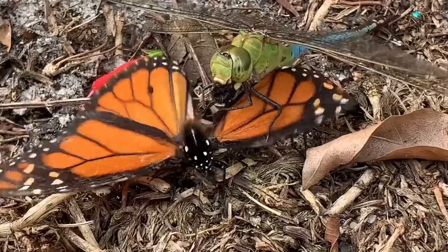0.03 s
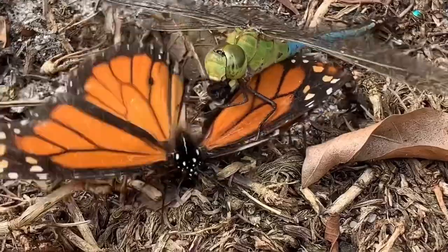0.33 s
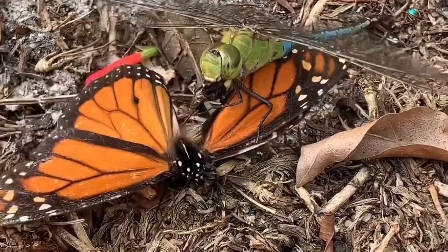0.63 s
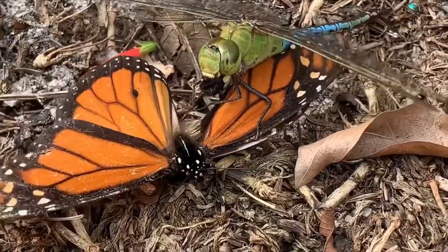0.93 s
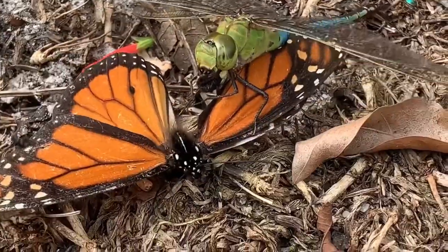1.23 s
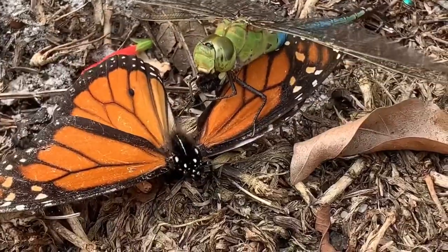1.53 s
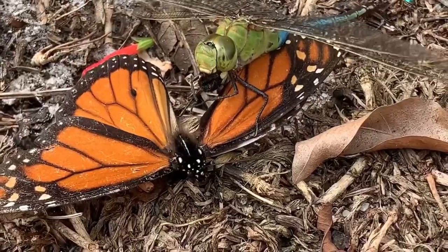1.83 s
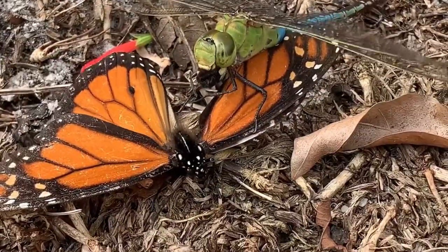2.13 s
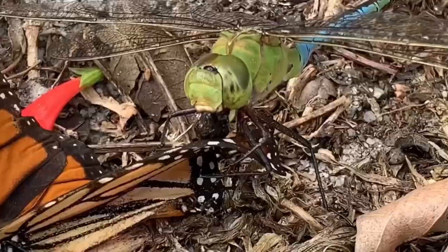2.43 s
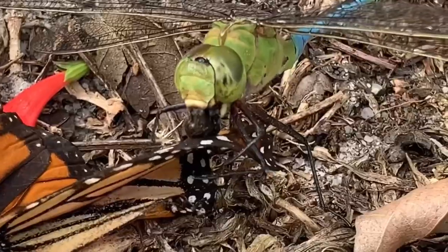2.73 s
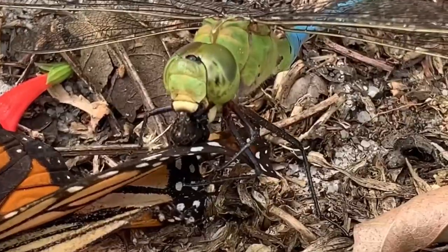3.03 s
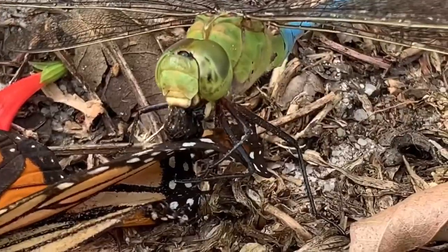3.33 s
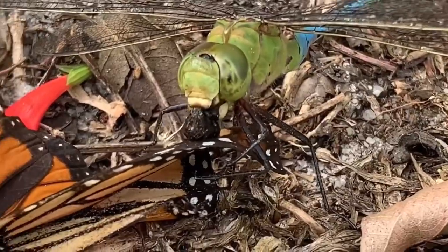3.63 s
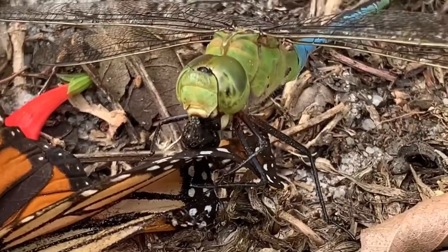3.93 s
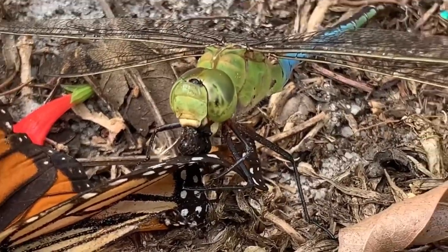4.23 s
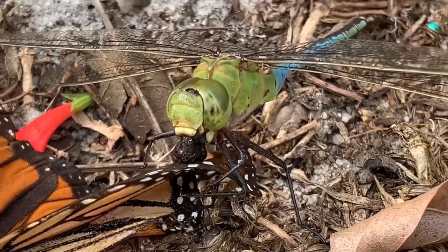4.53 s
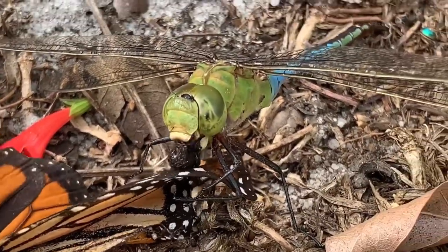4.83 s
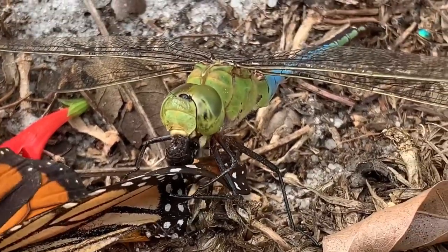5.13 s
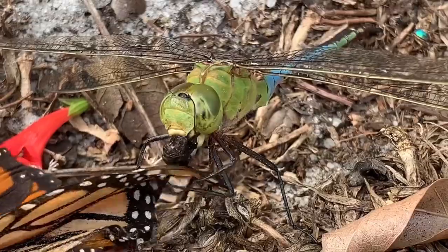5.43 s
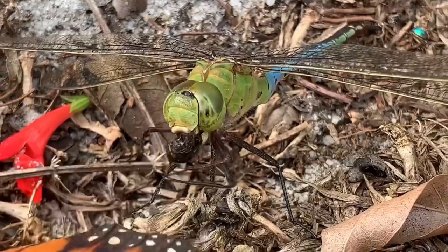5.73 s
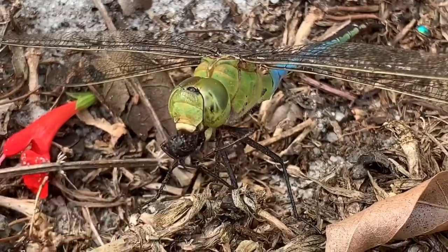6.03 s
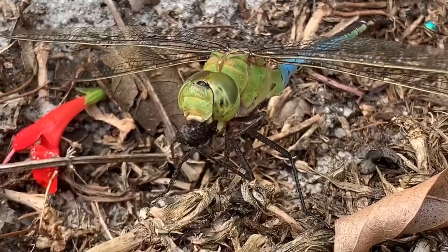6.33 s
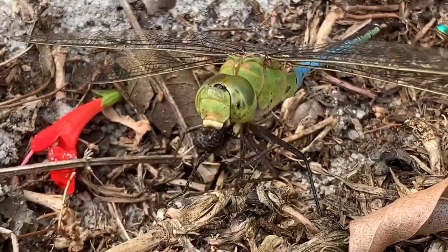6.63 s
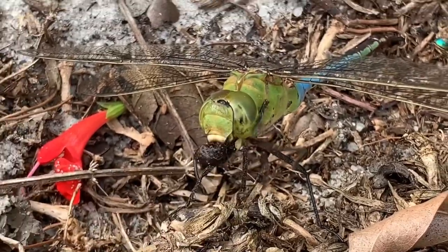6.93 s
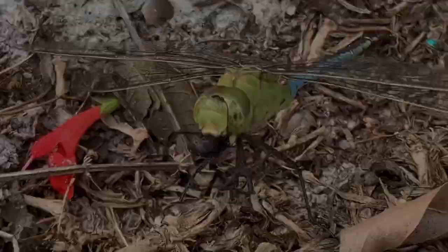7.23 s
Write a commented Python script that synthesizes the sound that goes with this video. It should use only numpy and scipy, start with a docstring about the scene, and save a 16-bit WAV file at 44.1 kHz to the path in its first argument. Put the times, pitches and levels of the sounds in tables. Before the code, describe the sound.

Outdoors, gusts rumble and slap against a close microphone while a butterfly held by a dragonfly rustles its wings on dry leaf litter, with small snaps. After about two seconds the wind cuts off with a tick, leaving a faint low hum of distant traffic. Near the end the wings scrape again, with one crisp burst of crackles, soft papery knocks and a small twig click.

```python
"""Gusts thump on a small stereo microphone while wings rustle and dry leaves snap close by:
a dragonfly grips a butterfly on leaf litter. Turbulent eddies make the rumble and the slaps;
stick-slip friction of wing on leaf makes the rustle. At 2.3 s the scene jumps, with a tick, to a
calm spell with the low hum of distant traffic, where the wings scrape again, the litter knocks
under the harder blows and a twig clicks."""
import sys
import numpy as np
from scipy import signal
from scipy.fft import rfft, irfft
from scipy.io import wavfile
from scipy.ndimage import uniform_filter1d

SR = 44100
rng = np.random.default_rng(int(sys.argv[2]) if len(sys.argv) > 2 else 0)


def wav_out(sig):
    """Save sig, one row per channel (or a flat mono array), as 16-bit PCM at SR to the path in sys.argv[1]."""
    wavfile.write(sys.argv[1], SR, np.round(np.clip(np.atleast_2d(sig).T, -1, 1) * 32767).astype(np.int16))


N = 330750
T = np.arange(N) / SR
HZ = np.fft.rfftfreq(N, 1 / SR)
CALM_START_S, CALM_END_S = 2.345, 7.353
EDDY_LEAD_S = 0.02  # an eddy stirs the air this long before it lands

# Spectra of the steady breeze and of calm air: f/Hz, relative level/dB
BREEZE_SPECTRUM = [(100, -6), (400, 11), (700, 7), (1200, 3), (1900, 3), (2600, -4), (3600, -2.5),
                   (5000, -11.5), (8000, -15), (12000, -17.5), (15500, -17.5)]
AIR_SPECTRUM = [(500, -0.5), (1000, -4.5), (1500, 1.5), (2100, -2.5), (2800, -8), (5000, -13.5),
                (8000, -15), (11500, -14.5), (13200, -15), (14500, -27.5), (15500, -27)]
# Spectra of massed engines and of one far engine: f/Hz, relative level/dB
ENGINES_SPECTRUM = [(12, -75), (20, -24), (41, -6.5), (80, -2.5), (97, 3), (122, -8.5), (189, -9.5),
                    (227, -17), (265, -13.5), (468, -31), (500, -33.5), (643, -41.5), (1100, -61),
                    (1430, -86), (2420, -120)]
DRONE_SPECTRUM = [(100, -23), (170, -0.5), (280, -2), (400, -13.5), (600, -24), (900, -48.5)]
# Spectra of tyre roar, tyre hiss and the roar from one side: f/Hz, relative level/dB
ROAR_SPECTRUM = [(250, -5.5), (450, -2), (650, 6.5), (850, -5.5), (1200, -52)]
TYRE_HISS_SPECTRUM = [(800, -22), (1200, -17.5), (1450, 4.5), (1800, -17), (2200, -4), (2700, -32),
                      (4000, -60)]
SIDE_ROAR_SPECTRUM = [(500, -19), (800, 8.5), (1050, -3.5), (1450, -8), (1900, -26.5)]
# Faint distant hums: start t/s, end t/s, f/Hz, level/dB
DISTANT_HUMS = [(1.7, 2.34, 410, -68), (4.5, 5.25, 660, -87), (6.15, 6.55, 277, -70), (5.6, 7.35, 200, -70),
                (6.55, 7.35, 770, -83), (6.3, 7.2, 712, -87), (6.5, 7.3, 647, -87), (6.9, 7.35, 532, -83)]
# Strength of the wind at the microphone: t/s, level/dB
WIND_STRENGTH = [(0.0, -35.5), (0.03, -28.5), (0.1, -37), (0.27, -29), (0.29, -37.5), (0.5, -38),
                 (0.55, -28), (0.74, -29), (0.77, -41.5), (0.86, -35.5), (0.87, -26), (1.07, -46.5),
                 (1.12, -35), (1.18, -53.5), (1.24, -38.5), (1.29, -51.5), (1.54, -58.5), (1.64, -29.5),
                 (1.91, -65.5), (2.22, -52), (2.25, -25.5), (2.34, -55.5)]
# Broad swirls that swell the rumble: t/s, gain/dB
SWIRL_GAINS = [(0.146, 6), (0.286, 5), (0.37, 7), (0.75, 3.5), (1.041, 8), (1.683, 6.5), (2.204, 11)]
# The hardest eddies, heard as slaps: t/s, sharp edge level/dB, dull thump relative level/dB
EDDY_SLAPS = [(0.028, -34, -17.5), (0.062, -44, -26.5), (0.082, -38, -24), (0.099, -37.5, -32),
              (0.133, -36, -22), (0.153, -41, -23.5), (0.185, -38.5, -27), (0.197, -42, -23),
              (0.229, -43, -31), (0.252, -31, -21), (0.297, -53, -27.5), (0.36, -57.5, -35),
              (0.399, -59, -26), (0.468, -42, -30), (0.537, -46.5, -23), (0.57, -40.5, -19.5),
              (0.601, -30, -27.5), (0.632, -25.5, -25), (0.657, -24.5, -20.5), (0.682, -32, -24),
              (0.707, -37.5, -28.5), (0.734, -51, -24.5), (0.814, -62, -36), (0.85, -46.5, -34),
              (0.875, -39.5, -20.5), (0.895, -41.5, -23.5), (0.915, -35.5, -25.5), (0.958, -41, -28.5),
              (1.024, -64, -37), (1.091, -49, -33), (1.104, -37, -24.5), (1.115, -56, -28),
              (1.214, -67, -46.5), (1.616, -63, -29), (1.635, -52.5, -28), (1.668, -59, -32),
              (2.073, -75, -45.5), (2.238, -40.5, -30.5), (2.25, -49, -25)]
# Spectra of wind rumble, buffeting, and a slap's edge and thump: f/Hz, relative level/dB
RUMBLE_SPECTRUM = [(12, -49), (20, -7.5), (48, -1.5), (70, 0.5), (130, -5), (200, -15.5), (262, -20.5),
                   (362, -30.5), (398, -35), (500, -46.5), (650, -69), (1100, -120)]
BUFFET_SPECTRUM = [(60, -42), (130, -0.5), (190, 4), (300, -2), (450, -9), (650, -25), (1000, -33),
                   (1600, -62.5), (3000, -80.5)]
EDGE_SPECTRUM = [(150, -33.5), (450, -7), (700, 6), (900, -1.5), (1200, -5), (1700, -21.5), (2400, -37.5),
                 (4000, -61.5)]
THUMP_SPECTRUM = [(30, -30), (80, -1.5), (180, 6), (350, -1), (520, -4.5), (750, -20.5), (1200, -47.5),
                  (2500, -69.5)]
# Spectrum of the tick where the scene changes: f/Hz, relative level/dB
TICK_SPECTRUM = [(200, -7), (1000, -8), (3000, -4), (8000, -10), (16000, -19)]
# Modes of a dry twig: f/Hz, level/dB, 60 dB decay time/s
TWIG_MODES = [(1420, -58, 0.022), (1970, -60, .015), (2660, -58, .015), (3180, -55.5, 0.017)]
# Knocks of the litter under a wing: t/s, level/dB, decay time constant/s
LITTER_KNOCKS = [(5.941, -50.5, 0.013), (6.07, -62.5, 0.018), (6.391, -59.5, 0.0079)]
# Spectrum of a knock: f/Hz, relative level/dB
KNOCK_SPECTRUM = [(200, -17), (420, 11.5), (700, 0.5), (950, 3.5), (1400, 1.5), (2200, 2.5), (4000, -23)]
# Snaps of leaf and twig: t/s, relative level/dB, centre f/Hz, fall-off to each side/(dB per octave)
LEAF_SNAPS = [(0.0178, -50, 6000, 4), (0.025, -41.5, 6650, 10.5), (0.0447, -36, 7230, 9.5),
              (0.089, -49, 6790, 5), (0.2747, -53, 3360, -2.5), (0.2964, -52.5, 3090, 3.5),
              (0.5696, -41.5, 2980, -0.5), (0.6268, -57, 2940, 7), (0.7253, -50, 2800, 0),
              (0.783, -37, 15300, 14.5), (1.8537, -57, 3460, 11), (2.1257, -60, 3630, 10),
              (5.1896, -61, 10320, 18), (5.278, -56.5, 10100, 16), (5.409, -63, 6500, 10),
              (5.941, -38.5, 6500, 9), (5.9449, -33.5, 8570, 10), (5.949, -34, 11300, 10),
              (5.9539, -32.5, 6500, 14), (5.969, -42, 7600, 13.5), (6.041, -46.5, 12000, 3.5),
              (6.0694, -48, 4000, 2), (6.173, -53, 5000, 0), (6.328, -53, 10400, 8), (6.39, -54.5, 5390, 6),
              (7.0793, -51, 2720, 14)]
# Wing strokes: start t/s, duration/s, fine slip level/dB, coarse slip level/dB
WING_STROKES = [(0.008, 0.09, -55, -61.5), (0.144, 0.21, -78.5, -75), (0.282, 0.038, -79.5, -75),
                (0.58, 0.066, -81, -73), (0.712, 0.081, -65, -76), (1.573, 0.17, -81, -87),
                (2.115, 0.12, -77, -75.5), (5.225, 0.079, -77, -83.5), (5.316, 0.14, -78.5, -83),
                (5.387, 0.035, -78, -82), (5.478, 0.074, -71, -88), (5.555, 0.33, -87, -101),
                (5.882, 0.16, -67.5, -75), (5.939, 0.03, -45, -55.5), (6.043, 0.059, -69, -65.5),
                (6.14, 0.28, -92, -84), (6.32, 0.046, -88, -74.5)]
# Spectra of fine and coarse slips: f/Hz, relative level/dB
FINE_SPECTRUM = [(2000, -34), (5000, -3.5), (6600, -3.5), (9000, 1.5), (11000, -4), (13000, -0.5),
                 (15500, -3)]
COARSE_SPECTRUM = [(400, -12), (900, -0.5), (2000, -6), (3200, -1.5), (5500, -8), (7500, -10),
                   (12000, -25.5)]
# Lead of the left microphone port over the right: f/Hz, phase/rad
PORT_LEAD = [(0, 0), (950, -1.0), (2580, 2.4), (3620, 1.5), (6370, 5.9), (7490, 6.9), (7840, 8.2),
             (9560, 10.2), (10500, 12.3), (11600, 12.9), (12500, 15.4), (13700, 16.0), (14600, 18.6),
             (16200, 18.9)]
# Likeness of the sound at the two ports: f/Hz, coherence (0 to 1)
PORT_COHERENCE = [(60, 0.98), (130, 1), (290, 0.84), (600, 0.055), (1400, 0.12), (2400, 0.68), (3500, 0.22),
                  (4800, 0.99), (7000, .88), (15000, 1)]


def amp(db):
    """Amplitude ratio of a level in decibels."""
    return 10 ** (np.asarray(db) / 20)


def unit(x):
    """Normalisation to an rms of one."""
    return x / np.sqrt(np.mean(x ** 2) + 1e-20)


def read(points, hz):
    """Interpolation on a logarithmic frequency axis."""
    f, value = np.transpose(points)
    return np.interp(np.log(hz + 1), np.log(f + 1), value)


def add(mix, s, sound):
    """Superposition of a sound on the mix, from time s."""
    part = mix[..., max(round(s * SR), 0):][..., :sound.shape[-1]]
    part += sound[..., :part.shape[-1]]


def arch(start, end):
    """An envelope that swells and fades between two times."""
    return np.sqrt(abs(np.sin(np.pi * np.clip((T - start) / (end - start), 0, 1))))


def colour(x, spectrum):
    """Minimum-phase filtering: a causal response with the given spectrum."""
    log_gain = read(spectrum, abs(np.fft.fftfreq(4096, 1 / SR))) * np.log(10) / 20
    response = np.exp(np.conj(signal.hilbert(log_gain)))
    taps = np.fft.ifft(response).real[:2048]
    taps = taps.reshape((1,) * (x.ndim - 1) + (-1,))
    return signal.fftconvolve(x, taps, axes=-1)[..., :x.shape[-1]]


def hiss(spectrum):
    """Two incoherent Gaussian noises of one spectrum."""
    white = rfft(rng.standard_normal((2, N)))
    return unit(irfft(white * amp(read(spectrum, HZ)), N))


def wander(rate_hz):
    """Slow random fluctuation: low-pass noise of unit rms."""
    return unit(irfft(rfft(rng.standard_normal(N)) / (1 + (HZ / rate_hz) ** 4), N))


def grains(per_s, spread_db):
    """Shot noise: two Poisson trains of clicks, mostly small, a few large."""
    draw = rng.random((2, N)) * SR / per_s
    hit, clicks = draw < 1, np.zeros((2, N))
    sign = np.sign(rng.random((2, N)) - .5)
    clicks[hit] = sign[hit] * amp(spread_db * np.minimum(-np.log(draw[hit] + 1e-9), 4))
    return clicks


def steadied(x, seconds, share):
    """Envelope compression takes a share of the chance swells out of a noise."""
    power = uniform_filter1d(x ** 2, int(seconds * SR)) + 1e-9
    return unit(x / power ** (share / 2))


def ports(pair, mono_hz=450):
    """Partial coherence at two close ports: alike in the bass, turning in phase in the treble."""
    left, unrelated = rfft(pair)
    coherence = np.clip(read(PORT_COHERENCE, HZ), 0, 1)
    phase = np.interp(HZ, *np.transpose(PORT_LEAD)) * (1 - 1 / (1 + (HZ / mono_hz) ** 4))
    right = (coherence * left + np.sqrt(1 - coherence ** 2) * unrelated) * np.exp(-1j * phase)
    return irfft(np.array([left, right]), N)


def patchy_hiss(spectrum, depth_db, patch_s=0.09, patch_hz=220):
    """Random amplitude modulation: a hiss whose narrow bands flicker in short patches."""
    hz, frames = np.fft.rfftfreq(1024, 1 / SR), N // 512 + 3
    real, imag = rng.standard_normal((2, 2, len(hz), frames))
    flicker = rng.standard_normal((len(hz), frames))
    for axis, span in enumerate([patch_hz * 1024 / SR, patch_s * SR / 512]):
        flicker = uniform_filter1d(flicker, round(span), axis)
    db = read(spectrum, hz)[:, None] + depth_db * np.minimum(unit(flicker), 1)  # deep dips, low crests
    _, noise = signal.istft((real + 1j * imag) * amp(db), nperseg=1024, noverlap=512, window="cosine")
    return unit(noise[:, :N])


def hums(waver=0.005, flutter_db=3):
    """Slow frequency and amplitude modulation makes thin, distant tones waver."""
    out = np.zeros((2, N))
    drift, flutter = wander(6.5), amp(flutter_db * wander(6.1))
    for start, end, hz, db in DISTANT_HUMS:
        cycles = np.cumsum(hz * (1 + waver * drift)) / SR + rng.random((2, 1))
        out += amp(db) * arch(start, end) * flutter * np.sqrt(2) * np.sin(2 * np.pi * cycles)
    return out


def approach(start_db=-91, growth_db_per_s=2.5, swell_db=-0.1):
    """Level rises as distance falls: the gain of tyre roar from a nearing vehicle."""
    return amp(start_db + growth_db_per_s * (T - CALM_START_S) + swell_db * wander(2.3))


def traffic(engines_db=-56, drone_db=-71, hiss_db=-88.5, hiss_swell_db=1.5):
    """Incoherent sources add in power: far engines, their tyres and one vehicle drawing near."""
    engines = amp(engines_db) * steadied(hiss(ENGINES_SPECTRUM), seconds=0.21, share=0.55)
    drone = amp(drone_db) * arch(start=4.0, end=7.3) * hiss(DRONE_SPECTRUM)
    tyre_hiss = amp(hiss_db + hiss_swell_db * wander(9)) * patchy_hiss(TYRE_HISS_SPECTRUM, depth_db=9.5)
    return engines + drone + approach() * hiss(ROAR_SPECTRUM) + tyre_hiss


def sideways_roar(gain_db=-3):
    """Phase difference: tyre roar from one side reaches the two ports in antiphase."""
    return amp(gain_db) * approach() * hiss(SIDE_ROAR_SPECTRUM)[0] * np.array([[1], [-1]])


def eddy(spectrum, lag_cycles=0.5952, build_s=0.0029, wake_s=0.011, churn=1.35):
    """A pressure pulse with a turbulent wake; group delay puts its lows after its highs."""
    t = T[:4096] - T[round(EDDY_LEAD_S * SR)]
    wake = rng.standard_normal(len(t)) * np.exp(-abs(t) / np.where(t < 0, build_s, wake_s))
    push = churn * wake / np.linalg.norm(wake) + (t == 0)
    hz = np.fft.rfftfreq(len(t), 1 / SR)
    dispersion = np.exp(-2j * np.pi * lag_cycles * np.log(hz + 60))
    jolt = irfft(rfft(colour(push, spectrum)) * dispersion)
    return rng.choice([-1, 1]) * jolt / abs(jolt).max()


def wind(rumble_db=-27, buffet_db=-33.5, thump_gain_db=2, side_db=-12, edge_side_db=-7.5, split_hz=480):
    """Turbulent pressure at the microphone: slow swings, a hail of small eddies and hard slaps."""
    gust = amp(np.interp(T, *np.transpose(WIND_STRENGTH)) + 30.5)  # one at a full gust
    swirl_db = sum(db * np.exp(-((T - s) / 0.02) ** 2) for s, db in SWIRL_GAINS)
    swings = steadied(hiss(RUMBLE_SPECTRUM)[0], seconds=0.021, share=0.8)
    hail = steadied(colour(grains(per_s=350, spread_db=4), BUFFET_SPECTRUM), seconds=0.1, share=0.56)
    # rumble grows slowly with the wind; buffeting grows steeply, then saturates
    rumble = amp(rumble_db + swirl_db) * gust ** 0.59 * swings
    mid, side = amp(buffet_db) * np.tanh(gust ** 1.78) * hail * amp([[0], [side_db]])
    for s, edge_db, thump_db in EDDY_SLAPS:
        edge = amp(edge_db) * eddy(EDGE_SPECTRUM)
        thump = amp(thump_db + thump_gain_db) * eddy(THUMP_SPECTRUM)
        add(mid, s - EDDY_LEAD_S, edge + thump)
        add(side, s - EDDY_LEAD_S, amp(edge_db + edge_side_db) * eddy(EDGE_SPECTRUM))
    # above the split, the small eddies and the edges of the slaps differ between the two ports
    side = signal.sosfilt(signal.butter(8, split_hz, "high", fs=SR, output="sos"), side)
    return rumble + mid + np.array([side, -side])


def tick(peak_db=-41):
    """A broadband impulse, heard as a small dry tick where the scene changes."""
    out = np.zeros(N)
    pulse = colour(signal.unit_impulse(4096), TICK_SPECTRUM)
    add(out, CALM_START_S, amp(peak_db) * pulse / abs(pulse).max())
    return out


def twig(click_s=7.08):
    """Free vibration: a dry twig clicks once and rings in quickly damped modes."""
    out, t = np.zeros((2, N)), T[:4096]
    for hz, db, t60 in TWIG_MODES:
        add(out, click_s, amp(db - 60 * t / t60) * np.sin(2 * np.pi * (hz * t + rng.random((2, 1)))))
    return out


def knocks():
    """Damped impact response: the springy bed of leaves answers hard blows with a papery knock."""
    out, t = np.zeros((2, N)), T[:8192]
    for s, db, decay_s in LITTER_KNOCKS:
        noise = unit(colour(rng.standard_normal((2, len(t))), KNOCK_SPECTRUM))
        add(out, s, amp(db) * np.exp(-t / decay_s) * noise)
    return out


def snaps(gain_db=-4, ripple_db=5, decay_s=0.0023, tail_db=-27, tail_s=0.018):
    """Resonance and scattering: a burst excites a leaf's uneven modes; the litter adds a faint tail."""
    out, t = np.zeros((2, N)), T[:4096]
    bands = np.geomspace(200, 16000, 60)
    envelope = np.exp(-t / decay_s) + amp(tail_db) * np.exp(-t / tail_s)
    for s, db, hz, falloff in LEAF_SNAPS:
        leaf_db = ripple_db * rng.standard_normal(len(bands)) - falloff * abs(np.log2(bands / hz))
        burst = unit(colour(rng.standard_normal((2, len(t))), np.c_[bands, leaf_db]))
        add(out, s, amp(db + gain_db) * envelope * burst)
    return out


def slips(spectrum, clump_db=3.5):
    """Stick-slip friction: a wing drags over litter in clumps of tiny slips."""
    clicks = grains(per_s=8100, spread_db=6) * amp(clump_db * wander(70))
    return unit(colour(clicks, spectrum))


def wings(rise_share=0.12, release_share=0.21):
    """Friction noise follows contact pressure as each wing stroke presses on, drags and lifts off."""
    pressure = np.zeros((2, N))
    for start, duration, *levels_db in WING_STROKES:
        progress = T[:SR] / duration
        press = np.minimum(progress / rise_share, 1)
        lift = np.exp(-np.maximum(progress - 1, 0) / release_share)
        add(pressure, start, amp(levels_db)[:, None] * press * lift)
    fine, coarse = pressure
    return fine * slips(FINE_SPECTRUM) + coarse * slips(COARSE_SPECTRUM)


def scene(breeze_db=-67, air_db=-80, balance_db=0.2):
    """Superposition of the sources: a windy spell, then a calm one, with the insects in both."""
    windy, calm = T < CALM_START_S, T >= CALM_START_S
    breeze = amp(breeze_db) * patchy_hiss(BREEZE_SPECTRUM, depth_db=5)
    distance = amp(air_db) * patchy_hiss(AIR_SPECTRUM, depth_db=4.5) + traffic()
    litter = wings() + snaps() + knocks() + twig()
    airborne = ports(windy * breeze + calm * distance + hums() + litter) + calm * sideways_roar()
    airborne *= amp([[balance_db], [-balance_db]])
    return (airborne + windy * wind() + tick()) * (T < CALM_END_S)


def record(dry, low_cut_hz=42, high_cut_hz=15850):
    """Band limiting: a high-pass removes the deepest rumble, a steep low-pass the highest treble."""
    high_passed = signal.sosfilt(signal.butter(4, low_cut_hz, "high", fs=SR, output="sos"), dry)
    low_pass = signal.firwin(511, high_cut_hz, window=("kaiser", 9), fs=SR)
    return signal.oaconvolve(high_passed, low_pass[None], "same")


dry = scene()
out = record(dry)
wav_out(out)
```